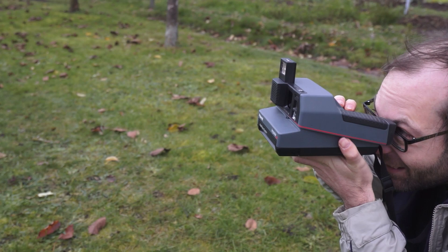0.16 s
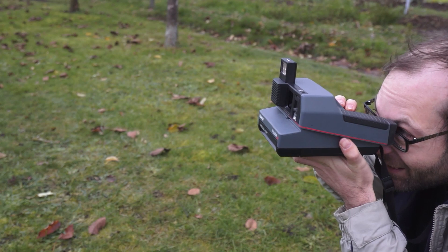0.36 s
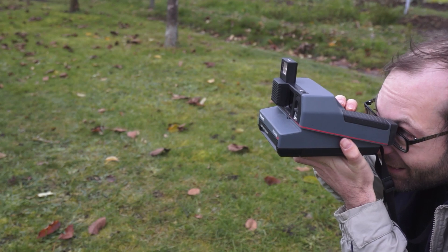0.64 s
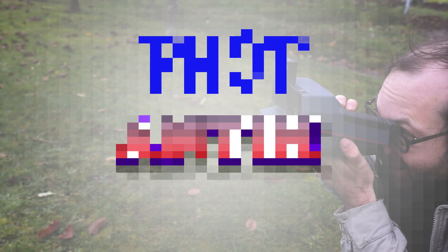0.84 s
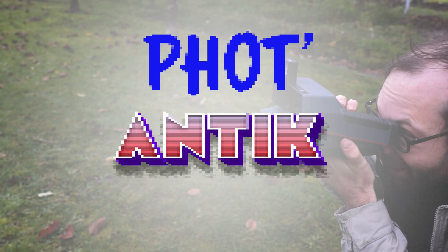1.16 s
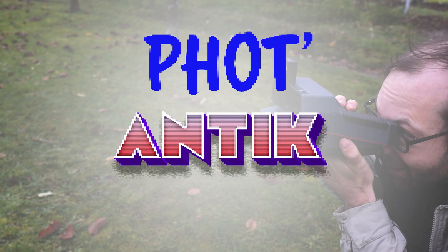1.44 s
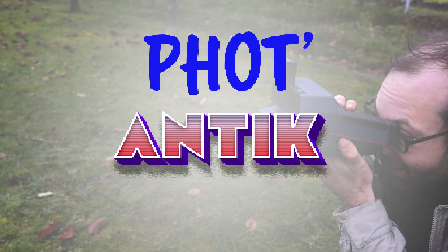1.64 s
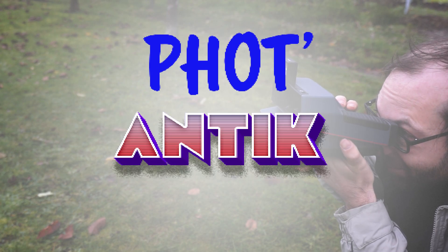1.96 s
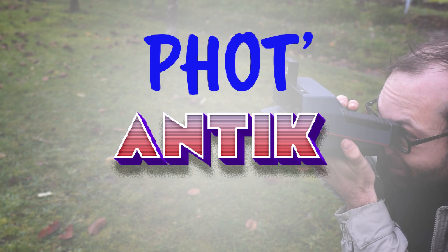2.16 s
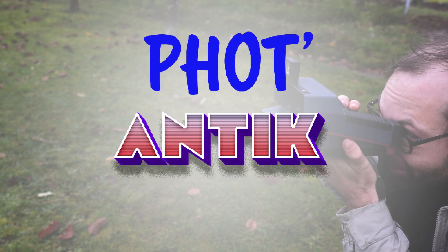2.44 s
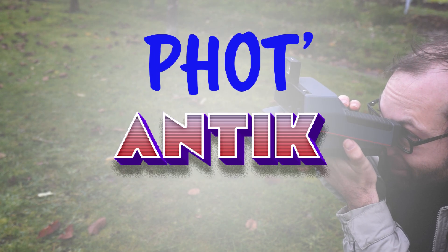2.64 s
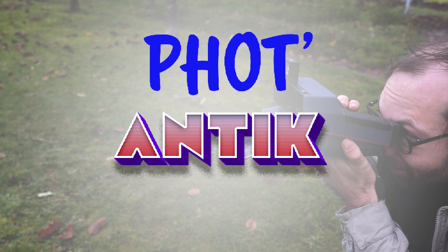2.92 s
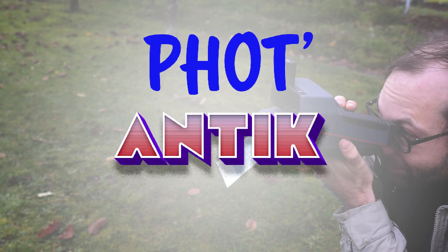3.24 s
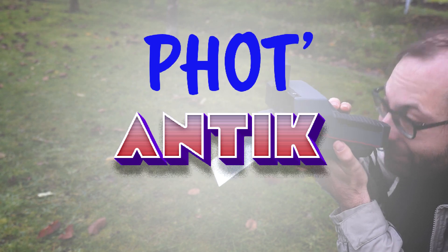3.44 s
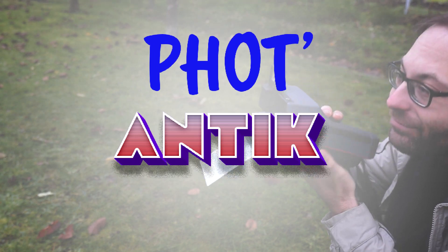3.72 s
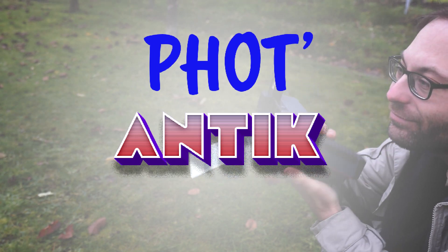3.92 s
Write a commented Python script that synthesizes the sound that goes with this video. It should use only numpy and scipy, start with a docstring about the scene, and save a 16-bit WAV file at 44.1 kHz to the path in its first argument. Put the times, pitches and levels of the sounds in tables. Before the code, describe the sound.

Close, dry view of an instant camera in the open air, centred. Soft low rumble first, then a rapid double clack of shutter and latches with a hollow body knock. A small geared motor buzzes steadily, drops under load, and grinds gradually higher while ejecting the print, with scattered ticks. A sharp burst of clicks frees it; a weaker whir follows, one last click, and it dies away into faint rumble.

```python
"""Outdoors, an instant camera over distant traffic, the same in both channels.
Traffic is noise of a changing spectrum plus two wavering low drones; its level falls abruptly twice.
Shutter and latches click: noise bursts through a bright ring, with a low knock of the hollow body.
A small motor spins up, sags as rollers grip the print, whines pushing it out, runs on and stops with a click:
tooth noise through the body's resonances, and sines at multiples of the shaft's turning rate."""
import sys
import numpy as np
from scipy import signal
from scipy.io import wavfile
from scipy.ndimage import uniform_filter1d

SR = 44100
rng = np.random.default_rng(int(sys.argv[2]) if len(sys.argv) > 2 else 0)


def convert_level_to_amplitude(level_db):
    """Map a level in decibels to its linear amplitude factor."""
    exponent = np.asarray(level_db, float) / 20
    return 10 ** exponent


def to_wav(sig):
    """Store sig (one row per channel, or 1-D mono) as 16-bit WAV at the path in sys.argv[1].

    Samples outside -1..1 are clipped; the rate is SR.
    """
    pcm = np.clip(np.atleast_2d(sig), -1, 1) * 32767
    pcm = np.round(pcm).astype(np.int16)
    wavfile.write(sys.argv[1], SR, pcm.T)  # frames by channels


N = 180192
T = np.arange(N) / SR


def evened(x):
    """Scales to rms 1."""
    return x / np.sqrt(np.mean(x ** 2) + 1e-20)


def read(points, hz):
    """Reads a spectrum on a log-frequency axis."""
    f, value = np.transpose(points)
    return np.interp(np.log(hz + 1), np.log(f + 1), value)


def humps(peaks, hz):
    """Summed power of resonances (f/Hz, width/Hz, level/dB) at each frequency."""
    return sum(convert_level_to_amplitude(db) ** 2 / (1 + (2 * (hz - f) / width) ** 2) for f, width, db in peaks)


def wander(span_s):
    """Slow random signal of rms 1: noise averaged twice over span_s."""
    width = max(int(span_s * SR), 1)
    once = uniform_filter1d(rng.standard_normal(N), width)
    return evened(uniform_filter1d(once, width))


def curves(rows):
    """Every column of a table after the time column, sample by sample."""
    s, *columns = np.transpose(rows)
    return [np.interp(T, s, c) for c in columns]


def split(x, hz):
    """First-order low band and the remainder."""
    low = signal.sosfilt(signal.butter(1, min(hz, 15000), fs=SR, output="sos"), x)
    return low, x - low


def causal(gain, size=2048):
    """Minimum-phase impulse response with this gain."""
    log_gain = np.log(np.maximum(np.r_[gain, gain[-2:0:-1]], 1e-5))
    return np.fft.ifft(np.exp(np.conj(signal.hilbert(log_gain)))).real[:size]


def traffic():
    """Distant rumble: random short-time spectra whose colour drifts, plus engines idling far off."""
    # rumble spectrum early: f/Hz, level/dB
    far_early = [(15, -18), (30, -10), (42, -1), (75, 0.5), (126, -1.5), (230, -10), (290, -8),
                 (420, -13.5), (1080, -14.5), (1890, -22), (3790, -25), (5150, -24), (11900, -32.5),
                 (15700, -35.5)]
    # rumble spectrum late: f/Hz, level/dB
    far_late = [(12, -51), (20, -23), (38, 2), (59, 0.5), (85, -15), (116, -0.5), (226, -14), (260, -10.5),
                (325, -11.5), (5750, -24.5), (15700, -30)]
    # idling engines: f/Hz, level re rumble/dB
    drones = [(51.5, -7.5), (118, -7)]
    # level of all traffic: t/s, level/dB
    far_level = [(.06, -31.5), (.98, -33), (1.06, -42.5), (2.1, -41.5), (2.9, -37), (3.26, -38),
                 (3.3, -47.5), (4.09, -46.5)]

    frames, hz = N // 512 + 5, np.fft.rfftfreq(2048, 1 / SR)
    real, imag, patches = rng.standard_normal((frames, 1025, 3)).T
    # patches of 1 dB rms, smooth over 14 bins and 6 frames
    patches = evened(uniform_filter1d(uniform_filter1d(patches, 14, 0), 6, 1))
    late = np.interp(np.arange(frames) * 512 / SR, [1.0, 3.5], [0, 1])
    colour_db = np.outer(read(far_early, hz), 1 - late) + np.outer(read(far_late, hz), late)
    gain = convert_level_to_amplitude(colour_db + patches)
    spectra = (real + 1j * imag) * gain / np.sqrt((gain ** 2).mean(0))
    x = evened(signal.istft(spectra, nperseg=2048, noverlap=1536)[1][:N])
    for drone_hz, db in drones:
        # the idle wavers in pitch and throbs
        phase = 2 * np.pi * np.cumsum(drone_hz * (1 + 0.0333 * wander(0.095))) / SR
        x = x + convert_level_to_amplitude(db + 1.7 * wander(0.035)) * np.sin(phase)
    return x * convert_level_to_amplitude(curves(far_level)[0])


def body(hz, load):
    """Gain of the plastic body: resonances on a broad colour; load 1 = print between the rollers."""
    # resonances: f/Hz, width/Hz, level running free/dB, level with the print gripped/dB
    housing = [(525, 62, -33, -4), (807, 39, -6.5, -1.5), (1681, 132, 4, 5.5), (2120, 97, 1, -4),
               (2783, 144, -4.5, 1), (3410, 174, -3, 1.5), (3710, 160, -4.5, 3), (4800, 530, -5.5, -1.5),
               (5750, 30, 5, 2.5), (6540, 360, -3.5, 0), (7210, 155, 1, 0.5), (8040, 350, 1, -8.5),
               (9050, 100, 0, -24), (9740, 115, 1.5, 3.5), (10230, 125, 4, -3), (11600, 240, -8, 2),
               (12800, 290, -22, -4.5)]
    # broad colour between them: f/Hz, level/dB
    shell_colour = [(100, -31.5), (200, -33), (330, -23.5), (560, -4), (1380, -7), (2400, -11),
                    (3500, -9.5), (4100, -16.5), (4800, -7), (8800, -6), (11800, -4.5), (13600, -10),
                    (13900, -26), (15700, -17)]

    modes = [(f, width, free_db + (loaded_db - free_db) * load) for f, width, free_db, loaded_db in housing]
    return np.sqrt(humps(modes, hz) * (hz > 200) + convert_level_to_amplitude(read(shell_colour, hz)) ** 2)


def clicks():
    """Latches and ticks: noise bursts excite a bright ring and a slower-rising knock of the hollow body."""
    # t/s, peak of the bright part/dB, ring f/Hz, t60/s, knock re bright peak/dB
    latches = [(1.0055, -3.5, 8060, 0.025, -9.5), (1.010, -5, 4800, 0.024, -14),
               (1.0801, -12.5, 7200, 0.031, -10), (1.097, -22, 9500, .017, -6),
               (1.102, -18, 8900, 0.02, -2.5), (1.1158, -18, 3000, 0.014, -4),
               (1.1255, -7.5, 7900, 0.031, -9.5), (1.1301, -5, 9400, .014, -7),
               (1.1391, -1.5, 5900, 0.018, -11), (1.1668, -17, 5670, 0.02, -4.5),
               (2.128, -9.5, 11500, 0.22, -13), (2.1315, -14.5, 3560, 0.031, -5.5),
               (2.29, -18, 9400, 0.017, -4.5), (2.411, -17, 8250, .014, -24),
               (2.797, -15, 6000, 0.019, -10), (2.9022, -5.5, 5750, 0.021, -9),
               (3.177, -5.5, 8800, 0.018, -16), (3.257, -1.5, 6700, 0.017, -32),
               (3.268, -4.5, 10700, 0.009, -32), (3.2699, -3.5, 10900, .017, -13),
               (3.273, -7, 10500, 0.027, -11.5), (3.321, -12, 10200, 0.022, -22),
               (3.327, -25, 10100, 0.048, 6), (3.5258, -9.5, 7460, 0.029, -6),
               (3.5293, -13.5, 3030, 0.028, -7.5), (3.5563, -24.5, 5800, 0.031, -0.5)]
    # low rings of the hollow body: f/Hz, width/Hz, level/dB
    knock_rings = [(520, 120, -4), (805, 110, 1), (1300, 200, -5), (1800, 250, -1)]
    min_rise_s, rise_per_t60, knock_rise_s = 0.0004, 0.013, 0.00082

    out, t, hz = np.zeros(N + 16384), np.arange(8192) / SR, np.fft.rfftfreq(4096, 1 / SR)
    shell = body(hz, 0.58) ** 0.26  # body colour, flattened
    low_cut = hz ** 2 / (hz ** 2 + 420 ** 2)
    hollow = causal(np.sqrt(humps(knock_rings, hz) + convert_level_to_amplitude(-9) ** 2) * low_cut / (1 + (hz / 2300) ** 2))
    tilt = hz / (hz + 3000) / (1 + (hz / 13000) ** 4)
    noises = rng.standard_normal((len(latches), 2, 8192))
    for (s, db, ring_hz, t60_s, knock_db), noise in zip(latches, noises):
        fall_db = -60 * t / max(t60_s, 0.004)
        rise = (1 - np.exp(-t / (min_rise_s + rise_per_t60 * t60_s))) ** 2
        # fast decay, with a weak tail that falls slower
        burst = noise[0] * rise * (convert_level_to_amplitude(fall_db) + convert_level_to_amplitude(-29 + 0.15 * fall_db))
        ring = np.sqrt(convert_level_to_amplitude(-9.5) ** 2 + humps([(ring_hz, 900, 0)], hz))
        top = signal.fftconvolve(burst, causal(shell * ring * tilt))
        thud = noise[1] * (1 - np.exp(-t / knock_rise_s)) * convert_level_to_amplitude(0.53 * fall_db)
        knock = signal.fftconvolve(thud, hollow)
        at = round(s * SR)
        both = top / abs(top).max() + convert_level_to_amplitude(knock_db) * knock / abs(knock).max()
        out[at:at + len(top)] += convert_level_to_amplitude(db) * both
    return out[:N]


def motor():
    """Tooth rattle shaken through the body, and sine whine of commutator and roller gear locked to the shaft."""
    # speed that the load allows: t/s, turning rate/(turns/s)
    shaft = [(1.74, 199), (1.886, 192.6), (2.1, 188.5), (2.175, 181), (2.215, 149), (2.24, 140),
             (2.305, 134.5), (2.414, 151.3), (2.552, 160.5), (2.744, 165.8), (2.896, 172), (2.98, 178.8),
             (3.094, 182.3), (3.186, 191.5), (3.27, 195.7), (3.34, 168.6), (3.4, 190.8), (3.52, 174)]
    # gear train: t/s, level of the lower band/dB, level of the treble/dB
    gears = [(1.17, -37.5, -58), (1.228, -32.5, -34), (1.4, -33.5, -37.5), (2.0, -27, -29),
             (2.12, -26, -27.5), (2.17, -28, -30.5), (2.846, -27, -22), (3.249, -24.5, -21.5),
             (3.256, -34, -25), (3.285, -33, -32.5), (3.4, -34, -46), (3.47, -31.5, -36), (3.52, -34, -38),
             (3.55, -42, -47), (3.63, -42.5, -51), (3.72, -63, -78)]
    # rollers take the print, hold it, let it go, are free: t/s
    grip_s = (2.13, 2.2, 3.27, 3.3)
    # commutator whine: multiples of the turning rate
    hum_orders = (3, 4, 5, 6, 7, 8, 9, 10, 11, 12, 13, 16, 17, 25, 29, 33, 36)
    # each order running free: level/dB
    hum_free_db = (-46.5, -46.5, -43.5, -46, -50, -52, -37.5, -47.5, -49, -46, -50.5, -58, -49, -49, -60,
                   -56, -52.5)
    # each order under load: level/dB
    hum_loaded_db = (-50.5, -48.5, -56, -50, -75, -61, -54, -59, -72, -46, -56, -59, -59, -65, -62, -68,
                     -72)
    # slower wheels, roller-gear mesh and overtones: shares of the mesh rate
    mesh_shares = (.19, .25, 1, 1.125, 1.25, 3, 4, 5)
    # each share with the print gripped: level/dB
    mesh_levels_db = (-51.5, -53, -42.5, -52, -55, -44.5, -49, -53)
    # narrow rings that swell a line crossing them: f/Hz, width/Hz, level/dB
    swells = [(542, 50, 8), (796.4, 21, 13), (2160, 114, 4), (7200, 700, 8), (9610, 260, 16),
              (11540, 550, 22)]
    # all whine: t/s, level/dB
    whine_level = [(1.18, -2), (1.22, -2.5), (1.32, -1), (2.3, -2), (2.46, -3.5), (2.9, 1.5), (3.245, 1.5),
                   (3.26, -18), (3.32, -19), (3.38, -5.5), (3.48, -10), (3.54, -17)]
    switch_s, spin_up_s = 1.125, 0.065  # start, time constant
    lag_db_per_order = 4  # high orders stay weak until up to speed
    teeth_per_turn = 14  # roller gear
    bite_s, bite_length_s, bite_db = 2.17, 0.025, 3  # mesh cries out as the rollers bite

    lag = np.exp(-np.maximum(T - switch_s, 0) / spin_up_s)
    speed = curves(shaft)[0] * (1 - lag)
    load = np.interp(T, grip_s, [0, 1, 1, 0])
    turns = np.cumsum(speed * (1 + (0.0011 + 0.0016 * load) * wander(0.01))) / SR
    once_a_turn = np.cos(2 * np.pi * turns)
    begin_s, end_s = gears[0][0], gears[-1][0]
    running = np.interp(T, [begin_s, begin_s + 0.0098, end_s - 0.04, end_s], [0, 1, 1, 0])

    # teeth strike unevenly, a little harder once a turn
    strikes = rng.standard_normal(N) * convert_level_to_amplitude(1.1 * wander(0.00093)) * (1 + 0.036 * once_a_turn)
    hz = np.fft.rfftfreq(4096, 1 / SR)
    free, gripped = (evened(signal.oaconvolve(strikes, causal(body(hz, grip)))[:N]) for grip in (0, 1))
    shaken = free + (gripped - free) * load
    low, high = split(shaken, 6140)
    low_db, treble_db = curves(gears)
    rattle = evened(low) * convert_level_to_amplitude(low_db) + evened(high) * convert_level_to_amplitude(treble_db)

    lines = []  # (multiple of the turning rate, level/dB)
    for order, free_db, loaded_db in zip(hum_orders, hum_free_db, hum_loaded_db):
        lines.append((order, free_db + (loaded_db - free_db) * load - lag_db_per_order * order * lag))
    cry_db = bite_db * np.exp(-((T - bite_s) / bite_length_s) ** 2)
    mesh_db = cry_db - 40 * np.maximum(1 - 2 * load, 0)  # weak while the rollers are free
    # off-centre pinion bears harder once a turn; worn teeth make the overtones gritty
    wobble_db = 3.1 * once_a_turn + 3.5 * wander(0.0025)
    for share, db in zip(mesh_shares, mesh_levels_db):
        lines.append((teeth_per_turn * share, db + mesh_db + wobble_db * (share > 2)))

    # every line flutters as the teeth shift, more so under load
    flutter_db = 2.2 + 1.4 * load
    whine = np.zeros(N)
    for order, db in lines:
        swell = np.sqrt(1 + humps(swells, order * speed))
        tone = np.sin(2 * np.pi * (order * turns + rng.random()))
        whine += convert_level_to_amplitude(db + flutter_db * wander(0.024)) * swell * tone
    return running * (rattle + np.sqrt(2) * convert_level_to_amplitude(curves(whine_level)[0]) * whine)


def scene():
    """All sources, alike in both channels."""
    return np.tile(traffic() + clicks() + motor(), (2, 1))


def top_cut(x):
    """Nothing passes above the cut-off."""
    return signal.sosfilt(signal.butter(12, 16950, fs=SR, output="sos"), x)


def record(dry):
    """Silence until the sound starts, then a sharp band limit."""
    start_s, edge_hz = 0.0575, 15820
    edge = signal.firwin(767, edge_hz, window=("kaiser", 9), fs=SR)
    mix = signal.oaconvolve(dry * (T > start_s), edge[None], "same")
    return top_cut(mix)


dry = scene()
out = record(dry)
to_wav(out)
```